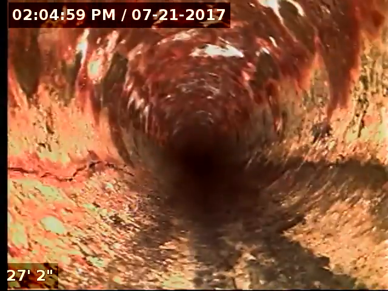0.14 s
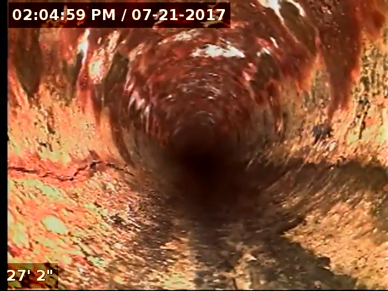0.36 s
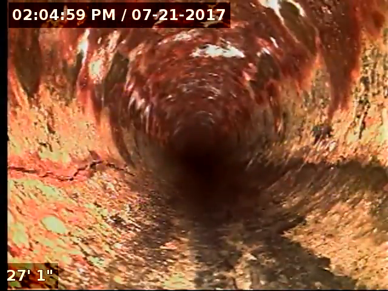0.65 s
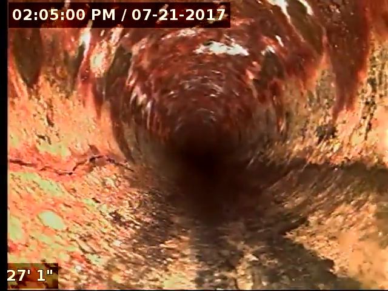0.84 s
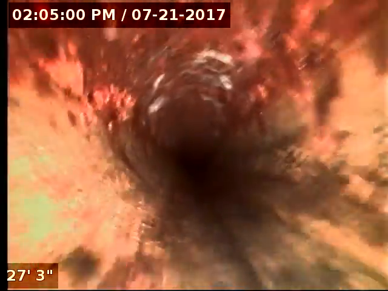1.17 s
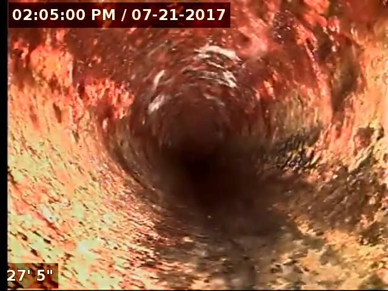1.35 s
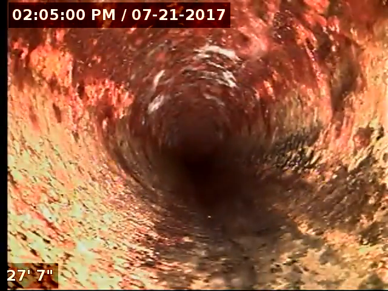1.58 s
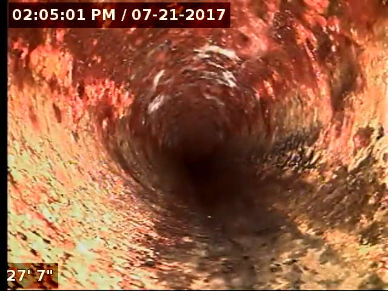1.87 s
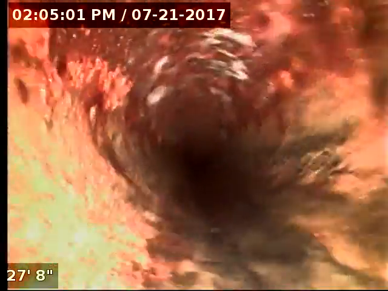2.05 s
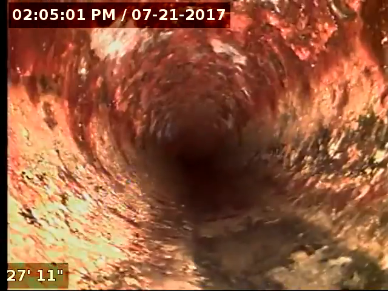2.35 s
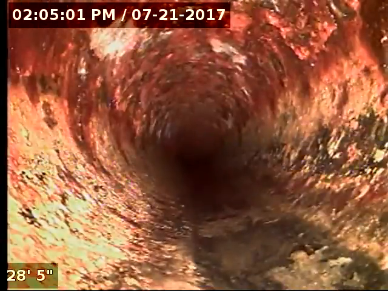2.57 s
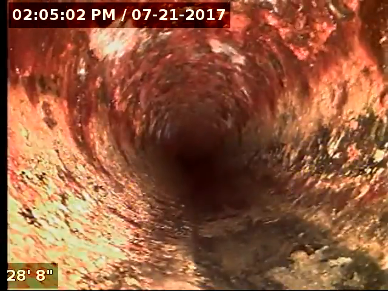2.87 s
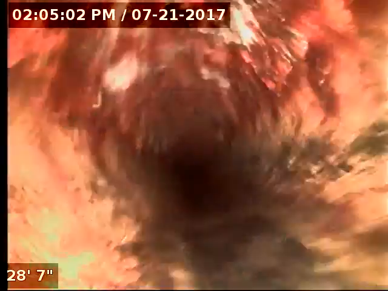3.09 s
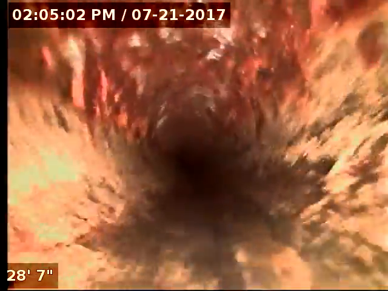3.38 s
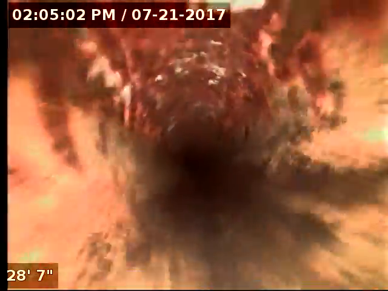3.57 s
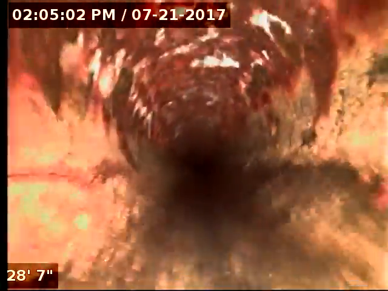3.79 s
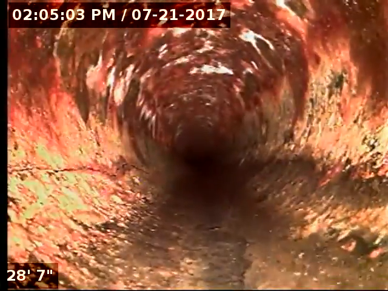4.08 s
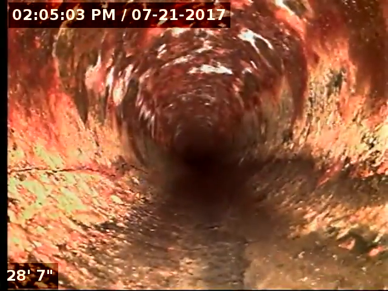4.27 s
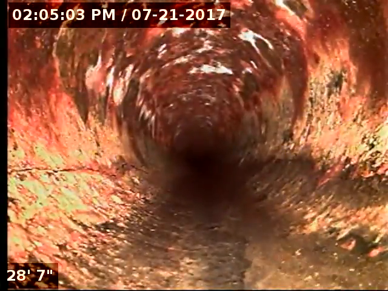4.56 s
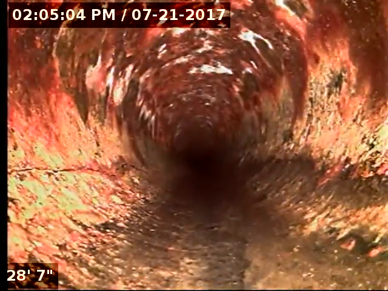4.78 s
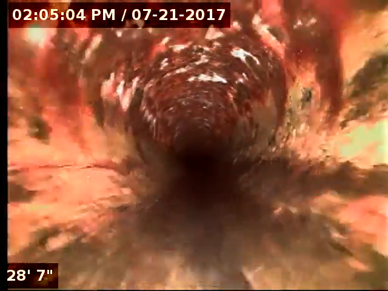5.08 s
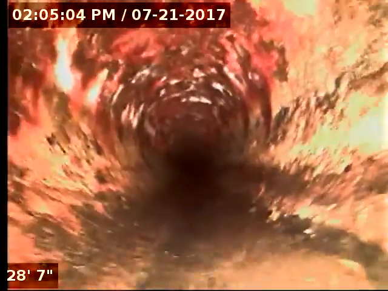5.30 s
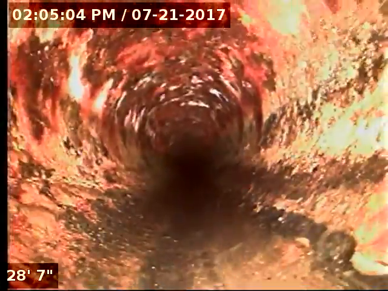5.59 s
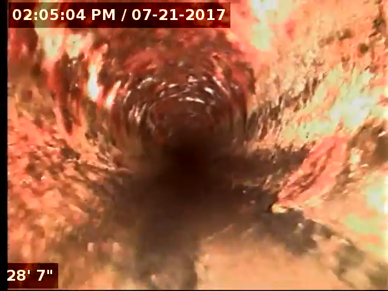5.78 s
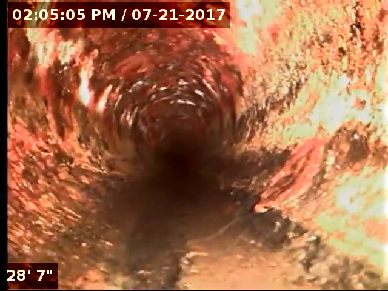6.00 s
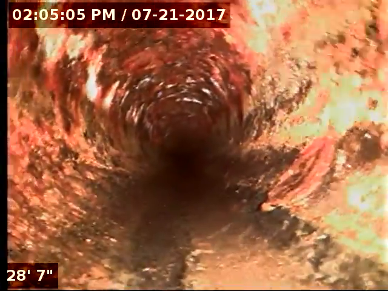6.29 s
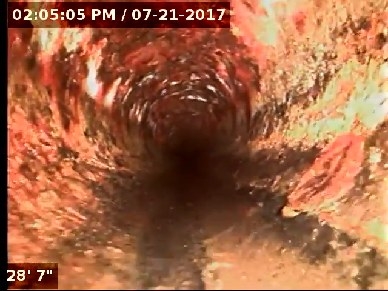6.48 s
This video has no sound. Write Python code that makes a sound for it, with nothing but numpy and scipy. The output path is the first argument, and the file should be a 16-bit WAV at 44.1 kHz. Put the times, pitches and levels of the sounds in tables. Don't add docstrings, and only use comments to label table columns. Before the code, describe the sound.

A stiff cable scrapes and knocks into a hollow pipe mouth, with low booms, brief spring rings and glove slides over faint room hum.

```python
import sys
import numpy as np
from scipy import signal
from scipy.fft import rfft, irfft
from scipy.io import wavfile
from scipy.ndimage import uniform_filter1d

SR = 44100
rng = np.random.default_rng(int(sys.argv[2]) if len(sys.argv) > 2 else 0)


def unload_wav(signal):
    wavfile.write(
        sys.argv[1],
        SR,
        np.round(np.clip(np.atleast_2d(signal).T, -1, 1) * 32767).astype(np.int16),
    )


def natural_amplitude(level_db):
    exponent = np.asarray(level_db, float) / 20
    return 10 ** exponent


N = 292824

# (time [s], scrape level [dB], bite on the rim over the scrape [dB])
FEED = [(0.0, -39.5, -15), (0.16, -47.5, -4), (0.55, -49, -0.5), (0.75, -45.5, -15), (1.0, -42.5, -8),
        (1.25, -48, -8), (1.57, -45.5, 0.5), (1.81, -50, -16), (2.15, -43, -9), (2.599, -49, -7),
        (2.92, -47, -8.5), (3.25, -43.5, -11), (3.42, -49.5, -12), (3.73, -43, -11.5), (4.14, -55, -12),
        (4.7, -50.5, -3), (5.6, -54, -14), (6.64, -48, -11.5)]
# (time [s], peak [dB], rim over peak [dB], tick over peak [dB], contact length [s])
HARD_KNOCKS = [(0.63, -30, -16.5, -24.5, .012), (0.731, -34, -17, -35, 0.0038),
               (0.786, -26.5, -19, -52, 0.0025), (0.819, -24.5, -26, -55, 0.0023),
               (0.92, -32.5, -8.5, -38, 0.021), (1.186, -24.5, -21, -25, 0.0067),
               (1.776, -30, -27.5, -43, 0.029), (2.115, -24.5, -6.5, -16, 0.012),
               (2.355, -23.5, 0.5, -12, 0.0046), (2.965, -31.5, -13.5, -37.5, 0.042),
               (3.027, -27, -9, -20.5, 0.003), (3.05, -17.5, -14.5, -35, 0.01),
               (3.124, -24, -30, -45, 0.0047), (3.146, -29, -17, -33, 0.0067),
               (3.353, -26.5, -15, -31, 0.0067), (3.491, -24, -23, -53, 0.0038),
               (4.111, -30, -24, -53.5, .011), (4.143, -28, -35, -44, 0.023),
               (4.358, -26.5, -7.5, -32, 0.017), (5.039, -21.5, -25, -66, 0.0083),
               (5.114, -20, -14, -25, 0.0032), (5.303, -26, -19.5, -29, 0.0013),
               (6.145, -21.5, -16, -55, 0.0045), (6.189, -22.5, -23.5, -38, .012)]
# (time [s], peak [dB], rim over peak [dB], tick over peak [dB], contact length [s])
HEAVY_KNOCK = [
    (1.8235, -28, -8, -54, .008),
]
# (time [s], peak [dB], rim over peak [dB], contact length [s])
LIGHT_TAPS = [(0.073, -35.5, -19, 0.004), (0.91, -33, -14, .0075), (0.961, -34.5, -15, .0068),
              (1.026, -34, -22, .0034), (1.134, -38, -25, 0.028), (1.223, -43, -10, .0055),
              (1.55, -35.5, -8, 0.0052), (1.766, -39, -21, 0.01), (1.86, -28, -34, .009),
              (1.951, -36.5, -34.5, .005), (2.037, -42.5, -12, 0.0056), (2.088, -36, -13, 0.0033),
              (2.236, -34.5, -33, 0.0037), (2.882, -30.5, -16.5, 0.0028), (2.936, -33.5, -22.5, 0.03),
              (3.233, -31.5, -33, 0.01), (3.609, -37, -32, 0.0058), (3.657, -34, -32, 0.0071),
              (3.742, -37, -15, 0.0019), (3.777, -37, -20, .005), (4.096, -36, -29, 0.013),
              (4.481, -39.5, -12, 0.02), (4.92, -37, -12, 0.005), (4.928, -36, -6.5, 0.01),
              (5.066, -34, -18, 0.0065), (5.141, -32, -22, 0.0087), (6.168, -35.5, -11, 0.013),
              (6.227, -34.5, -22, 0.005), (6.545, -35.5, -34, 0.012), (6.588, -39, -24, 0.0088)]
# (time [s], peak [dB], pitch [Hz], hold [s])
BOOMS = [(0.044, -36, 215.4, 0.063), (0.214, -36.5, 205, 0.024), (0.293, -40, 212, 0.027),
         (0.739, -24, 231, 0.0057), (0.767, -42, 268, .025), (0.821, -30.5, 438, 0.0085),
         (0.842, -39, 218, 0.006), (1.022, -34, 228, 0.024), (1.202, -22.5, 205, 0.012),
         (1.226, -36.5, 183, 0.012), (1.805, -30, 278, 0.06), (1.83, -16, 220, 0.041),
         (1.959, -36, 217.7, 0.029), (2.125, -36, 215.5, 0.043), (2.229, -36, 243.6, 0.047),
         (2.242, -31, 296, 0.016), (2.366, -28.5, 446, 0.014), (2.37, -20, 221.7, 0.012),
         (2.876, -39.5, 211, .025), (3.049, -33.5, 216, 0.062), (3.189, -39, 201, 0.028),
         (4.368, -38.5, 525, 0.0049), (4.379, -33, 205.7, 0.064), (4.927, -38.5, 209, 0.056),
         (5.109, -37, 212, 0.089), (6.04, -45, 84, 0.02), (6.147, -36, 428, 0.012),
         (6.156, -35, 220, 0.062), (6.23, -42, 210.4, .04), (6.558, -41.5, 201.6, 0.067)]
# (time [s], peak [dB], pitch [Hz], decay by 60 dB [s])
SPRING_RINGS = [(0.157, -50, 3060, 0.28), (0.2962, -41.5, 2200, .027), (0.9194, -65, 6700, .12),
                (1.0992, -45, 2500, 0.061), (1.2565, -48, 2210, .027), (1.262, -52.5, 3100, .15),
                (2.1253, -35.5, 2905, 0.2), (2.2554, -44.5, 2640, 0.18), (3.03, -31.5, 2670, 0.12),
                (3.053, -35.5, 2640, .062), (3.1454, -43, 2830, .2), (3.3686, -47, 2900, 0.21),
                (4.7687, -43, 1730, 0.17), (4.7883, -40.5, 1740, 0.13), (4.8417, -45, 1800, 0.069),
                (4.9298, -28.5, 1750, 0.026), (4.953, -50.5, 2890, 0.11), (4.9544, -67, 5200, .12),
                (4.9556, -45, 1810, 0.08), (5.1296, -41, 3060, 0.15), (5.1286, -58, 5170, 0.086),
                (5.3134, -46, 2860, 0.11)]
# (start [s], length [s], fastest at share [0-1], rasp [dB], fizz over rasp [dB])
STROKES = [
    (0.244, 0.36, 0.34, -51.5, -10),
    (0.878, 0.33, 0.77, -62.5, -22),
    (1.327, 0.4, 0.6, -55.5, -12),
    (2.104, 0.1, 0.14, -54.5, -10),
    (2.501, 0.43, 0.27, -54.5, -22),
    (2.931, 0.65, 0.18, -63.5, -11.5),
    (4.45, 0.41, 0.65, -50, -7.5),
    (5.105, 0.075, 0.17, -57, -6.5),
]
# (time [s], level [dB])
REEL_BLOWS = [
    (1.19, -60.5),
    (2.356, -48),
]
# (time [s], peak [dB], width [s])
MOUTH_SLAPS = [
    (1.8274, -1.5, .0009),
    (2.3575, -17, .0006),
    (3.053, -22, .0008),
]

# (frequency [Hz], width [Hz], level [dB])
COLUMN_MODES = [(220.3, 13, 0), (205, 27, -1.5), (266, 170, -11.5), (407, 105, -11), (434.4, 80, -21)]
# (frequency [Hz], width [Hz], level [dB])
PIPE_MODES = [(672, 81.3, -2), (781.6, 46.8, 2.5), (888, 89, -2.5), (1005, 33, -8), (1155, 80, -6),
              (1457, 70, -9)]
# (frequency [Hz], width [Hz], level [dB])
RIM_MODES = [(1707, 73, 2), (2114, 330, -4.5), (2640, 231, -6.5), (3103, 330, -16)]
# (frequency [Hz], width [Hz], level [dB])
TICK_MODES = [(5770, 1800, 3), (5700, 1600, 0.3), (6640, 520, 9.5)]
# (frequency [Hz], level [dB], decay by 60 dB [s])
REEL_PARTIALS = [(7014, -1, .17), (7138, -2, .2), (7429, -4, .12), (8866, -8, .2)]
LOWER_TILT = [3, 0, -3]
UPPER_TILT = [-4, -1, 2]

# (frequency [Hz], level [dB])
KNOCK_REACH = [(20, -17.5), (150, -2.5), (400, -5), (1700, 0), (3000, -14.5), (9000, -48)]
# (frequency [Hz], level per Hz [dB])
ROOM_AIR = [(15, -74), (25, -25.5), (149, -13), (215, -6.5), (249, -21), (359, -13), (505, -23),
            (711, -21.5), (1030, -21), (1190, -22.5), (1840, -34), (2660, -33.5), (3750, -50),
            (6570, -41.5), (8600, -57), (11200, -93), (18900, -120)]
# (frequency [Hz], level [dB])
RECORDER_COLOUR = [(20, -11), (3100, -2), (3600, -2.5), (3900, -13.5), (4000, -50.5), (4100, -11.5),
                   (4500, -5.5), (5000, -3.5), (7600, -1), (8300, -8), (8800, -13.5), (9100, -67.5),
                   (9500, -110), (22050, -110)]


def evened(x):
    return x / np.sqrt(np.mean(x ** 2) + 1e-20)


def peaked(x, db):
    return natural_amplitude(db) * x / np.sqrt(uniform_filter1d(x ** 2, 256).max())


def smoothed(x, size):
    return uniform_filter1d(uniform_filter1d(x, size), size)


def add(mix, s, sound):
    part = mix[max(round(s * SR), 0):][:len(sound)]
    part += sound[:len(part)]


def shape(x, points):
    hz, db = np.transpose(points)
    at = np.log(np.fft.rfftfreq(x.shape[-1], 1 / SR) + 1)
    gain = natural_amplitude(np.interp(at, np.log(hz + 1), db))
    return irfft(rfft(x) * gain, x.shape[-1])


def ring(x, modes, tilt_db=0):
    out = np.zeros(len(x))
    tilts = tilt_db * np.ones(len(modes))
    for k, ((hz, width, db), tilt) in enumerate(zip(modes, tilts)):
        r = np.exp(-np.pi * abs(width) / SR)
        w = 2 * np.pi * hz / SR
        gain = (-1) ** k * natural_amplitude(db + tilt) * (1 - r) * np.sin(w)
        out += gain * signal.lfilter([1], [1, -2 * r * np.cos(w), r * r], x)
    return out


def after(rows, db, fade_s):
    kicks = np.zeros(N)
    for s, peak_db, *_ in rows:
        add(kicks, s, natural_amplitude(2 * (peak_db + db)) * np.ones(1))
    return signal.lfilter([1], [1, -np.exp(-1 / (fade_s * SR))], kicks)


def blow(chance, length, rise=0.00092, first=0.58):
    t = np.arange(len(chance)) / SR
    length = max(length, .0005)
    strike = first * np.sqrt(length * SR / 2) * (t == 0)
    return strike + chance * (1 - np.exp(-t / rise)) * np.exp(-t / length)


def room_air():
    return natural_amplitude(-47.5) * evened(shape(rng.standard_normal(N), ROOM_AIR))


def friction(grit, clump_s, clump_db):
    clumps = evened(smoothed(rng.standard_normal(N), int(clump_s * SR)))
    slipping = rng.random(N) < 300 / SR
    slips = rng.standard_normal(N) * rng.exponential(1, N) * slipping
    return natural_amplitude(clump_db * clumps) * (rng.standard_normal(N) + grit * evened(slips))


def rubbing():
    times, *controls = np.transpose(FEED)
    feed_db, bite_db = (np.interp(np.arange(N) / SR, times, db) for db in controls)
    scrape = np.sqrt(natural_amplitude(2 * feed_db) + after(HARD_KNOCKS, -25, fade_s=0.14))
    column_db = -49.5 + 0.95 * (feed_db + 51) - 0.38 * (bite_db + 12.5)
    booms = [(s, min(db, -30.5)) for s, db, *_ in BOOMS]
    column = np.sqrt(natural_amplitude(2 * column_db) + after(booms, -8.5, fade_s=0.043))
    rough = friction(grit=0.32, clump_s=0.0038, clump_db=-0.5)
    heavy = friction(grit=0.38, clump_s=0.0095, clump_db=-2.5)
    fine = friction(grit=0.1, clump_s=0.052, clump_db=4.5)
    air = column * evened(ring(heavy, COLUMN_MODES))
    wall = scrape * evened(ring(rough, PIPE_MODES))
    rim = scrape * natural_amplitude(bite_db) * evened(ring(fine + .5 * rough, RIM_MODES))
    return air + wall + rim


def thumps():
    damp_t60_s = 0.069
    out, t = np.zeros(N), np.arange(8000) / SR
    for (s, db, hz, hold), phases in zip(BOOMS, rng.random((len(BOOMS), 3))):
        fall_db = -90 * t - 60 * np.maximum(t - hold, 0) / damp_t60_s
        level = (1 - np.exp(-t / 0.00069)) * natural_amplitude(fall_db)
        partials = zip((1, 1.33, 2), (1, .25, .25), phases)
        tone = sum(g * np.sin(2 * np.pi * (k * hz * t + u)) for k, g, u in partials)
        add(out, s - .003, peaked(level * tone, db))
    return out


def knocks():
    tap_tick_db = -34.5
    taps = [(s, db, rim, tap_tick_db, length) for s, db, rim, length in LIGHT_TAPS]
    hits = sorted(HARD_KNOCKS + taps) + HEAVY_KNOCK
    chances = rng.standard_normal((len(hits), 4096))
    places = rng.standard_normal((len(hits), 4, 4))
    half, lead = len(PIPE_MODES) // 2, 256
    fade = signal.windows.tukey(4096 + lead, .1)
    out = np.zeros(N)
    for (s, db, rim_db, tick_db, length), chance, place in zip(hits, chances, places):
        upper_db = db - 7.5 + 0.03 * (db + 24.5) + 0.34 * (rim_db + 11) - 0.035 * (tick_db + 36)
        force = np.append(np.zeros(lead), blow(chance, length))
        rattle = np.diff(np.append(np.zeros(lead + 1), blow(chance, length, first=0.068)))
        lower = shape(ring(force, PIPE_MODES[:half], 2 * place[0, :3] + LOWER_TILT), KNOCK_REACH)
        upper = shape(ring(force, PIPE_MODES[half:], 2 * place[3, :3] + UPPER_TILT), KNOCK_REACH)
        rim = ring(rattle, RIM_MODES, place[1])
        tick = ring(rattle, TICK_MODES, 2 * place[2, :3])
        wall = peaked(lower, db - 2.5) + peaked(upper, upper_db + 0.5)
        edge = peaked(rim, db + rim_db - 0.5) + peaked(tick, db + tick_db - 8.0)
        add(out, s - lead / SR, fade * (wall + edge))
    return out


def rings():
    out = np.zeros(N)
    chances = rng.standard_normal((len(SPRING_RINGS), 6000))
    for (s, db, hz, t60), chance in zip(SPRING_RINGS, chances):
        broad = ring(blow(chance, t60 / 7, first=0.46), [(hz, 500, 0)])
        add(out, s, peaked(ring(broad, [(hz, 150, 0)]), db - 3.0))
    return out


def sweep(x, hz, width):
    turn = np.exp(2j * np.pi * np.cumsum(hz) / SR)
    r = np.exp(-np.pi * width / SR)
    once = signal.lfilter([1 - r], [1, -r], x / turn)
    twice = signal.lfilter([1 - r], [1, -r], once)
    return evened((turn * twice).real)


def slides():
    out = np.zeros(N)
    for s, length, fastest, db, fizz_db in STROKES:
        u = np.arange(0, length, 1 / SR) / length
        bend = np.log(.5) / np.log(np.clip(fastest, .05, .9))
        speed = np.sin(np.pi * u ** bend) + 1e-4
        fall_db = 19 * (np.minimum(1.22 * speed, 1) - 1)
        a, b, c, *patches = rng.standard_normal((6, SR))[:, :len(u)]
        patch_db = [2.0 * evened(smoothed(p, 500)) for p in patches]
        rasp_db = db + fall_db + patch_db[0]
        hiss_db = db + fizz_db - 5 + 1.1 * fall_db - 5 * (u - 1.5) + patch_db[1]
        grow_db = db + fizz_db + 4 * (u - .5) + fall_db + patch_db[2]
        rasp = natural_amplitude(rasp_db) * sweep(a, 2830 + 220 * speed, width=1080)
        hiss = natural_amplitude(hiss_db) * sweep(b, 5050 + 0 * u, width=750)
        fizz = natural_amplitude(grow_db) * sweep(c, 6450 + 180 * speed, width=2000)
        add(out, s, (rasp + hiss + fizz) * signal.windows.tukey(len(u), .1))
    return out


def reel():
    out, t = np.zeros(N), np.arange(12000) / SR
    tink = sum(natural_amplitude(db - 60 * t / t60) * np.sin(2 * np.pi * hz * t) for hz, db, t60 in REEL_PARTIALS)
    for s, db in REEL_BLOWS:
        add(out, s, natural_amplitude(db) * tink)
    return out


def slaps():
    round_trip_s, loss_db = .0042, 7
    out, t = np.zeros(N), np.arange(-200, 300) / SR
    for s, db, width in MOUTH_SLAPS:
        pulse = np.exp(-np.hypot(t, .0001) / width) * (.85 * np.cos(2 * np.pi * 860 * t) + .15)
        for trip in range(3):
            add(out, s + t[0] + trip * round_trip_s, natural_amplitude(db - loss_db * trip) * pulse)
    return out


def scene():
    cable = rubbing() + thumps() + knocks() + rings()
    return (room_air() + cable + slides() + reel() + slaps())[None]


def roll_off(x):
    return signal.sosfilt(signal.butter(12, 8920, fs=SR, output="sos"), x)


def record(dry):
    mix = shape(dry, RECORDER_COLOUR)
    return roll_off(mix)


dry = scene()
out = record(dry)
unload_wav(out)
```